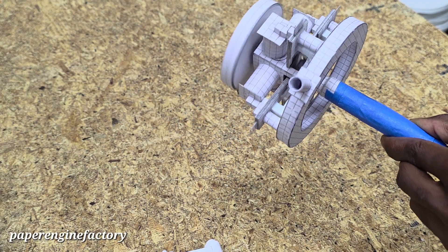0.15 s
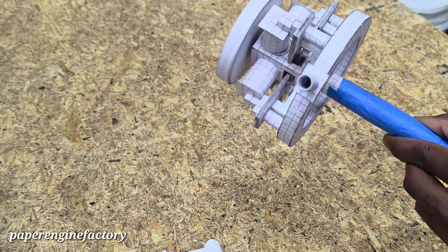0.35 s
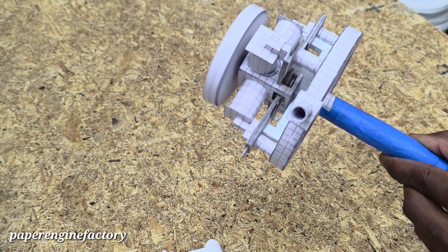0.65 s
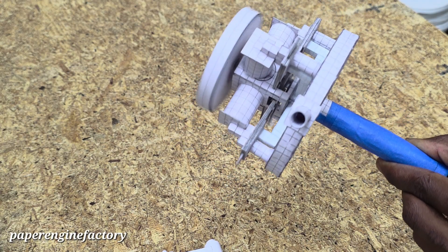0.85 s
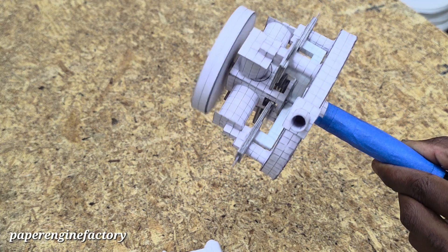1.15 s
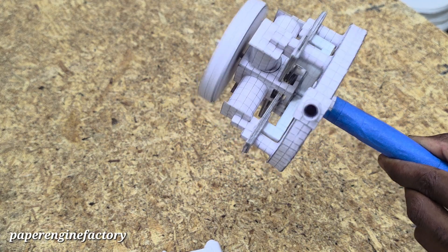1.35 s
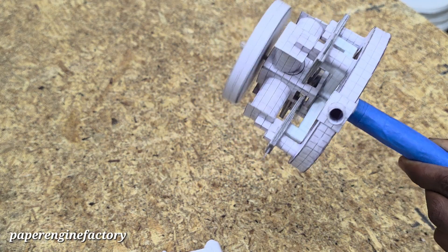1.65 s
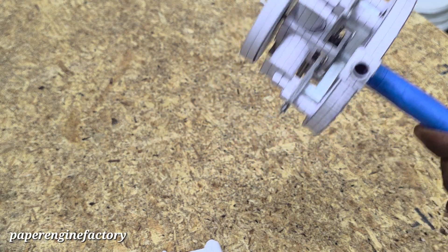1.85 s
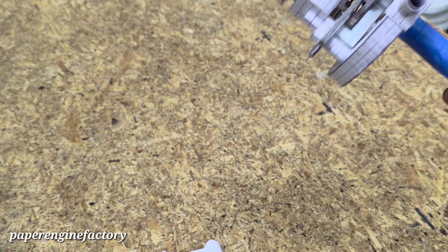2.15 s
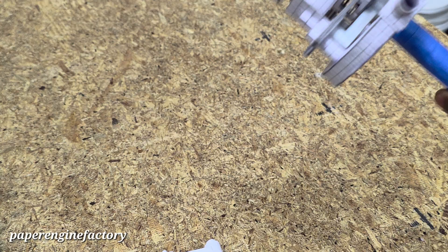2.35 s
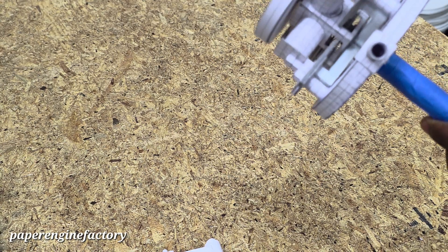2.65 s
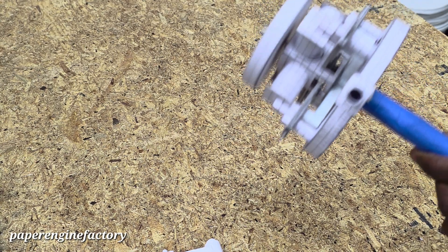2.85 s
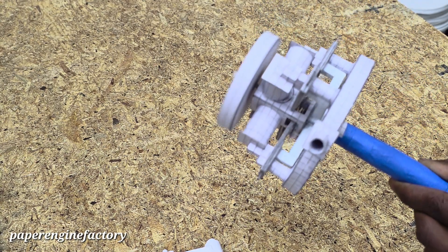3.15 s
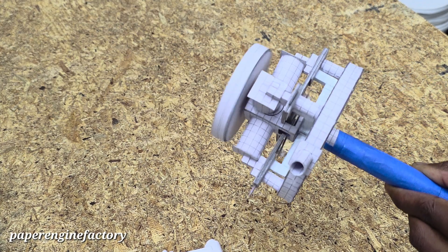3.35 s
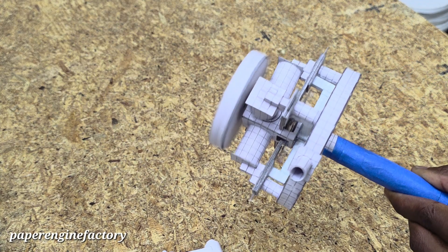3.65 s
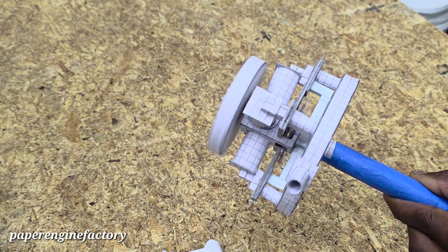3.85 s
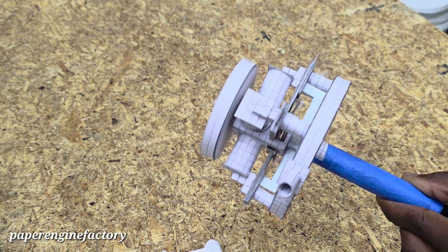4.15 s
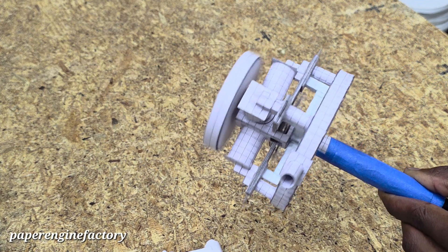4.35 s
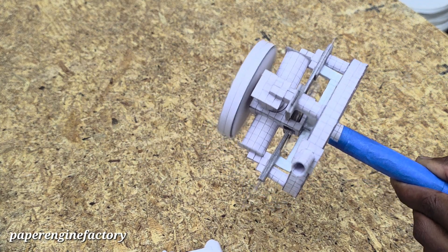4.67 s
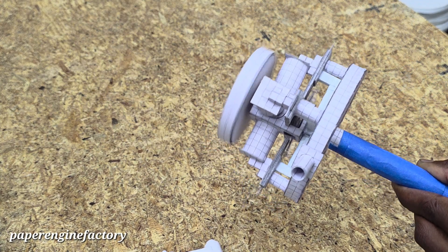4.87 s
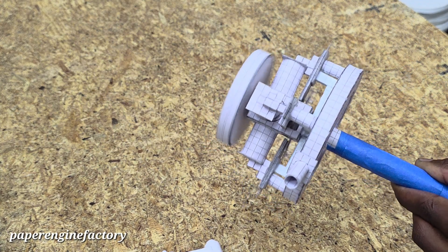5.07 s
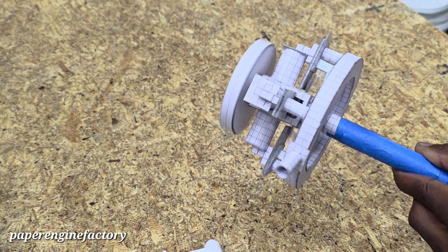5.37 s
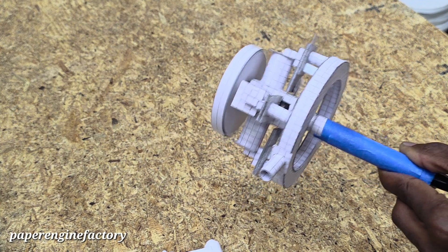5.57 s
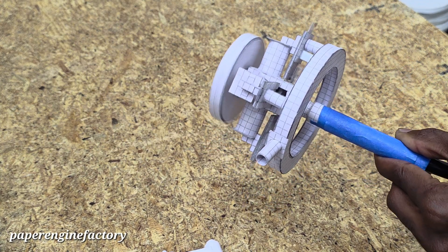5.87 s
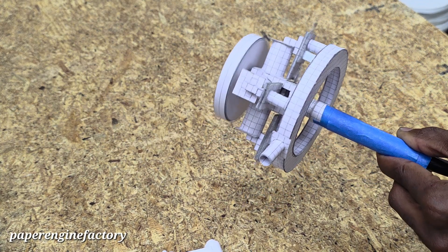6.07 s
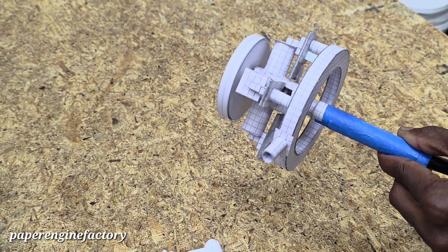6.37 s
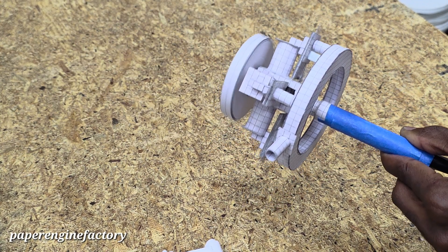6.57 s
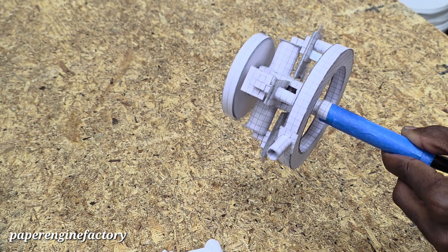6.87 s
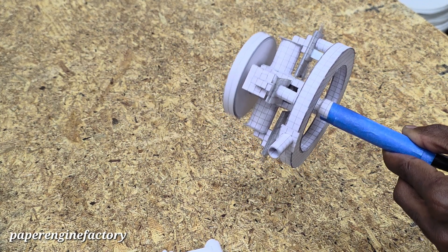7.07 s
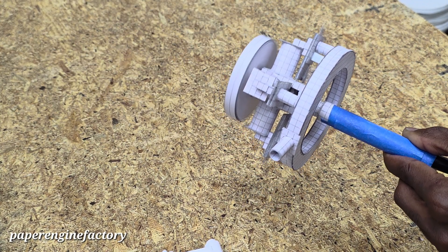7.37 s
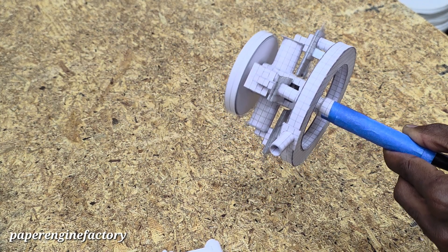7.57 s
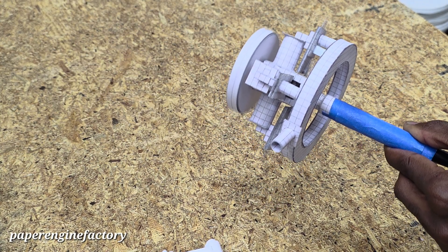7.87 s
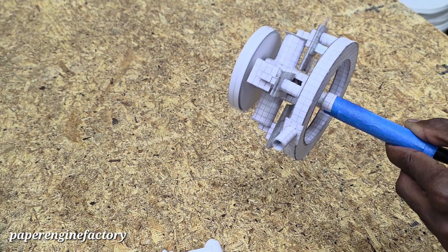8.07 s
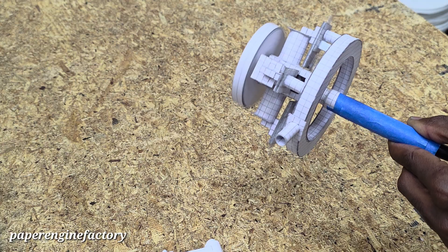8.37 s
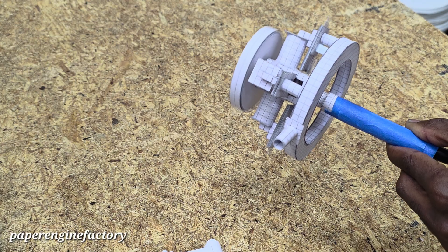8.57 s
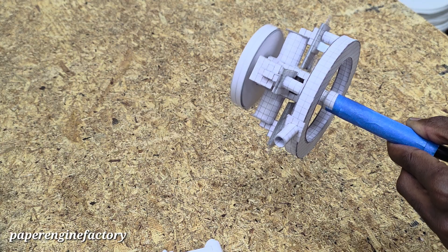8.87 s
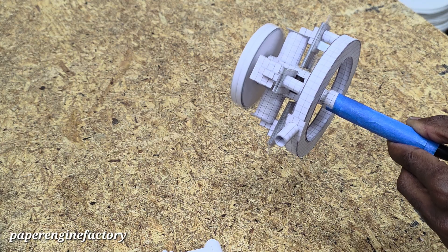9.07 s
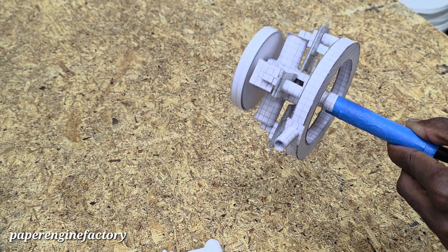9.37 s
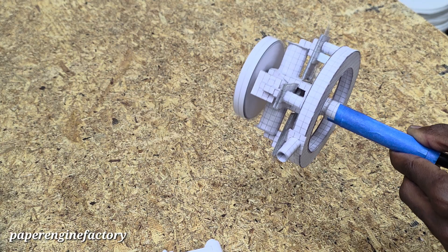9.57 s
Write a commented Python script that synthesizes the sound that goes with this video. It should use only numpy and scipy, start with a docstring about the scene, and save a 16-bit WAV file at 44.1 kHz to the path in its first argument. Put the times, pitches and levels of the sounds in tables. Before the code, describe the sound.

A small air-driven model engine idles faintly, then buzzes in rising and falling bursts over breathy hiss, finally settling into a fast, steady, rattling whirr.

```python
"""A faint hiss, chopped by exhaust puffs, idles first; bursts then lift pitch and level, and a steady run ends it.
A small paper engine, held over a chipboard bench, runs on compressed air; four uneven puffs a turn gate its noise.
Harmonics of the shaft rate make the hum; impulses through damped modes make the crank knocks and loose ticks.
The flywheel lags behind the air in the bursts. Low noise buffets two microphone ports of different colour."""
import sys
import numpy as np
from scipy import signal
from scipy.fft import rfft, irfft
from scipy.io import wavfile

SR = 44100
rng = np.random.default_rng(int(sys.argv[2]) if len(sys.argv) > 2 else 0)


def wrap_up_sound(samples):
    """Save the sound to the file named by the first command line argument, as 16-bit audio."""
    columns = np.atleast_2d(samples).T
    # keep every value between -1 and 1, then stretch to whole-number steps
    tamed = np.clip(columns, -1, 1)
    steps = np.round(tamed * 32767).astype(np.int16)
    wavfile.write(sys.argv[1], SR, steps)


N = 428652
TIME = np.arange(N) / SR  # s
FREQ = np.maximum(np.arange(N // 2 + 1) * SR / N, 1)  # Hz

# Idling on a trickle of air. Each row: time in seconds, air in dB, shaft speed in Hz (turns per second).
IDLE = [(0, -34, 23.5), (.13, -32.5, 21.3), (.2, -32.5, 23.34), (.49, -32.5, 24.94), (.66, -34, 23.3),
        (.76, -39, 21)]
# Bursts of air. Each row: valve opens in seconds, valve shuts in seconds, air before in dB, air at the top
# in dB, shaft before in Hz, shaft at the top in Hz, softness of the opening 0-1 (skew exponent of the rise).
BURSTS = [(0.844, 0.987, -36.5, -24.4, 21, 28.8, 0.46), (1.152, 1.273, -35.5, -24, 25.6, 34.1, 0.34),
          (1.397, 1.49, -31.5, -22.5, 32, 37.1, 0.27), (1.632, 1.785, -31, -21.5, 32.2, 41.85, 0.3),
          (2.044, 2.163, -40, -21.5, 18, 34.77, 0.36), (2.33, 2.454, -32, -21, 29.9, 38.33, 0.43),
          (2.548, 2.66, -30, -21.5, 32.3, 40.06, 0.7), (2.903, 3.037, -27, -19.5, 37.7, 46, 0.59),
          (3.189, 3.327, -29, -18, 37.3, 47.55, 0.44), (3.63, 3.832, -40, -15, 16.5, 62.4, 0.38),
          (4.014, 4.174, -32.5, -15.5, 22.9, 56.5, 0.39), (4.331, 4.467, -31, -15.5, 28.8, 54.9, 0.41),
          (4.648, 4.805, -25.2, -16, 44.8, 55.9, 0.51), (4.922, 5.059, -27.4, -17.5, 39.9, 52.15, 0.39),
          (5.188, 5.3, -27, -18.5, 39, 45.9, 0.57), (5.461, 5.535, -23.5, -19.0, 44, 45.57, 0.33),
          (5.687, 5.819, -26, -18.5, 41.6, 49.63, 0.32), (5.967, 6.148, -30.5, -17, 31.4, 49.1, 0.34)]
# The valve stays open. Each row: time in seconds, air in dB, shaft speed in Hz.
STEADY = [(6.28, -25, 38.9), (6.44, -22, 41.38), (6.67, -21.5, 42.62), (6.98, -18, 52.62),
          (7.11, -17, 56.15), (7.24, -16.5, 61.04), (7.29, -17.5, 60.03), (7.42, -18, 54.62),
          (7.57, -18.5, 55.45), (7.9, -15.5, 59.8), (8.02, -15.5, 64.4), (8.22, -16.5, 72.0),
          (8.4, -16, 64.7), (9.07, -15.5, 71.95), (9.33, -16, 73.04), (9.72, -16.5, 68.2)]
# The engine turns in the hand. Each row: time in seconds, top treble in dB, jet whistle in dB, low chuff
# in dB, band near 10 kHz in dB, all against the hiss; the air feed also shifts the two treble columns.
AIM = [(0, 4.5, -18, -24, -1), (.8, 3.5, -23, -13, 2), (1.5, 1, -19, -13, 1.5), (2.3, 3, -11, -11.5, 3.5),
       (2.9, 0, -10, -12.5, 1.5), (3.4, -.5, -20, -16, 2), (4.8, 0.5, -22, -20, 2),
       (5.8, 0.2, -21, -23, 1.5), (7.5, -0.3, -25, -33, 2), (9.7, 0.5, -21, -48, 2.5)]
# How far the flywheel faces the microphones. Each row: time in seconds, share 0-1.
FACING = [(0, 0.4), (.8, 0.3), (5, 0.4), (5.6, 0.3), (6.5, 0.99)]
# The exhaust puffs of one turn. Each entry: size in dB before random scatter.
PUFF_DB = [-2, -2.2, 2.5, -1]
# Colour of the rushing air. Each row: frequency in Hz, level in dB per Hz.
HISS = [(100, -19), (300, -3), (420, -12), (580, -9), (800, -14.5), (1100, -5), (1600, -3.5), (2100, -2),
        (3500, 0), (5100, -1.5), (8000, 0), (9200, -3), (14500, -2.5), (16000, -12.5)]
# Paper cavities rung by the air. Each row: frequency in Hz, width in Hz, level in dB seen from the side,
# level in dB seen from the flywheel, before slow drift.
CAVITIES = [(1174, 130, 4.5, 4), (2105, 156, -1.5, -4), (2925, 370, 0.5, -11.5), (3680, 190, -11, -4),
            (4360, 170, -9.5, -1.5), (6010, 470, -5.5, -8)]
# Colour of the chuff of slow, heavy puffs. Each row: frequency in Hz, level in dB per Hz.
CHUFF = [(120, -7.5), (260, 3), (330, -0.5), (450, -1), (750, -4.5), (1000, -5.5), (2000, -29), (5000, -50)]
# Exhaust hum. Each row: multiple of the shaft rate, relative dB at low speed, relative dB at high speed.
ORDERS = [(2, -28, -19), (3, -15, -8.5), (4, 3.5, 2), (5, -7.5, -7.5), (6, -4.5, -14), (7, -16.5, -22.5),
          (8, -7.5, -22), (9, -27, -21), (10, -9, -18.5), (12, -22, -31), (14, -16.5, -31), (18, -25, -22),
          (19, -35, -24)]
# Shell modes that lift the orders crossing them. Each row: frequency in Hz, width in Hz, added gain in dB.
SHELL = [(331.5, 76, -3.5), (1323, 250, 14.5)]
# The hum swells as the hand brings the exhaust nearer. Each row: time in seconds, gain in dB.
NEARNESS = [(0, 0.5), (1, 0.5), (1.8, 1), (3, 2.3), (3.7, 0.4), (5.5, 0.5), (6.2, -1.5), (7.3, 1.3),
            (8.3, -0.8), (9.7, -0.5)]
# How hard the crank knocks. Each row: time in seconds, dB against the air at the reference feed.
KNOCKING = [(0, -8), (.9, -20), (2.9, -21), (3.75, -11), (4.7, -10), (5.3, -15), (6.1, -10), (6.5, -14),
            (7.9, -14.5), (9.5, -22)]
# Modes of the frame under a knock. Each row: frequency in Hz, width in Hz, relative level in dB.
FRAME = [(330, 180, -16), (580, 180, -26), (1118, 63, 9), (1164, 58, 6.5), (1360, 80, -26.5),
         (2110, 130, -26), (3650, 400, -22)]
# Hard knocks of the crank. Each row: time in seconds, peak in dB before the room.
HARD_KNOCKS = [(3.705, -18), (3.742, -5), (4.072, -3), (4.102, -5), (4.439, -10), (4.457, -10),
               (6.055, -17), (6.124, -13), (6.898, -11)]
# Sharper clicks, some as the valve opens. Each row: time in seconds, impulse in dB before the body response.
CLICKS = [(.137, -24), (.287, -25), (.333, -22), (0.641, -23), (2.052, -25), (3.2, -19), (3.645, -24),
          (7.952, -8), (7.967, -17)]
# Colour of the buffeting. Each row: frequency in Hz, relative level in dB per Hz.
RUMBLE = [(15, -32), (45, -3), (85, -3.5), (130, -5), (220, -13), (500, -22), (2000, -70)]
# Stray air striking the ports. Each row: peak time in seconds, level in dB before flutter, length in
# seconds (centre to 1/e), left against right in dB.
GUSTS = [(1.066, -42, .09, 9), (1.6, -47, 0.28, 18), (2.2, -46, 0.089, 2), (3.1, -43, .12, 13),
         (3.8, -46, .12, 2), (4.16, -42, 0.081, 2), (5.25, -48, .1, 0), (6.85, -48, .2, -13),
         (7.37, -41.5, 0.099, -18), (8.67, -37, 0.084, -15), (9.5, -34.5, 0.089, -14)]
# Right port against the left. Each row: frequency in Hz, gain in dB.
RIGHT_PORT = [(120, 0), (370, -3), (550, -4.5), (930, -10.5), (1500, -8), (2200, -4), (4100, -0.5),
              (5200, -3.5), (8200, -3), (9200, -14), (10500, -9.5), (11800, 4.5), (13000, 6), (15500, 6)]

FLYWHEEL_LAG_S = .029  # in the bursts the speed follows the air this much later
REFERENCE_DB, REFERENCE_HZ = -20, 45  # air feed and shaft speed
HUM_DB = -25  # at the reference feed and speed, before nearness
HUM_PER_AIR, HUM_DB_PER_OCTAVE = 0.86, 3  # dB per dB of air, dB per octave of speed
STALL_HZ, STALL_DB_PER_OCTAVE = 28.4, 18  # below this speed the hum collapses
BRIGHT_PER_AIR = 0.21  # dB of extra top treble for each dB of air
DRAUGHT_DB = -50.5  # between the gusts, before flutter
TOP_HZ = 15800  # edge of the final low-pass


def undb(db):
    """Decibel definition: amplitude gain is ten to the power of dB over twenty."""
    return 10 ** (np.asarray(db) / 20)


def unit(x):
    """Normalisation: scale to rms 1."""
    return x / np.sqrt(np.mean(x ** 2))


def curves(table):
    """Linear interpolation: the columns of a timed table, sample by sample."""
    s, *columns = np.transpose(table)
    return [np.interp(TIME, s, c) for c in columns]


def colour(points):
    """Spectral envelope: gain over frequency from (Hz, dB) points, straight in log frequency."""
    hz, db = np.transpose(points)
    return undb(np.interp(np.log(FREQ), np.log(hz), db))


def resonances(modes):
    """Modal superposition: summed responses of damped oscillators."""
    return sum(undb(db) / (1 + 1j * (FREQ ** 2 - hz ** 2) / (FREQ * width)) for hz, width, db in modes)


def through(x, response):
    """Linear filtering: multiply the spectrum by a frequency response."""
    return irfft(rfft(x) * response, N)


def walk(rate):
    """Low-rate noise: random drift through `rate` knots per second, with a spread near 1."""
    knots = rng.standard_normal(8192)
    return 1.19 * np.interp(TIME * rate, np.arange(len(knots)), knots)


def pair(likeness):
    """Mid-side mixing: left and right noise with a given correlation."""
    mid, side = rng.standard_normal((2, N))
    c = np.clip(likeness, 0, 1)
    return np.sqrt((1 + c) / 2) * mid + np.sqrt((1 - c) / 2) * np.array([side, -side])


def scatter(cycle, spread_db):
    """Cycle-to-cycle variation: one random size for each cycle."""
    sizes = undb(spread_db * rng.standard_normal(8192))
    return sizes[cycle.astype(int) % 8192]


def ease(start, end, skew=1):
    """Raised-cosine step from 0 to 1; a skew under 1 makes it move early."""
    share = np.clip((TIME - start) / (end - start), 0, 1)
    return (1 - np.cos(np.pi * share ** skew)) / 2


def surges(idle, lows, tops, steady, rise_skews, fall_skew, lag_s=0):
    """Superposed steps from idle to steady: climb while the valve is open, sink until it opens again."""
    opens, shuts = np.transpose(BURSTS)[:2] + lag_s
    ends = np.append(opens[1:], STEADY[0][0])
    next_lows = np.append(lows[1:], steady[0])
    out = idle + (lows[0] - idle[-1]) * ease(IDLE[-1][0], opens[0])
    out = out + steady - steady[0]
    bursts = np.broadcast(opens, shuts, ends, lows, tops, next_lows, rise_skews)
    for start, shut, end, low, top, next_low, rise_skew in bursts:
        out = out + (top - low) * ease(start, shut, rise_skew)
        out = out + (next_low - top) * ease(shut, end, fall_skew)
    return out


def drive():
    """Inertia: the air level (dB) jumps at each burst; the flywheel's speed (Hz) follows late and more evenly."""
    (idle_db, idle_hz), (steady_db, steady_hz) = curves(IDLE), curves(STEADY)
    low_db, top_db, low_hz, top_hz, softness = np.transpose(BURSTS)[2:]
    air_db = surges(idle_db, low_db, top_db, steady_db, softness, fall_skew=0.58)
    shaft_hz = surges(idle_hz, low_hz, top_hz, steady_hz, rise_skews=.78, fall_skew=.654, lag_s=FLYWHEEL_LAG_S)
    return air_db, shaft_hz


def bench(x, lag_s=.0021, sway=0.0728, echo=0.25):
    """Comb interference: the bench returns the hiss a moment later; the swaying hand shifts the comb."""
    lag = lag_s * (1 + sway * walk(1.0))
    reflection = np.array([np.interp(TIME - lag, TIME, side) for side in x])
    return unit(x + echo * reflection)


def air(turns, air_db, puff_width=0.47, leak=1.0, puff_scatter_db=2.5, flutter_db=0.63, top_flutter_db=1.0,
        drift_db=2.0, whistle_hz=7900, whistle_width=900):
    """Flow-modulated turbulence: a steady leak plus a puff from each port in turn rings the paper cavities."""
    top_db, whistle_db, chuff_db, hollow_db = curves(AIM)
    facing = curves(FACING)[0]
    stroke = len(PUFF_DB) * turns
    size = undb(PUFF_DB)[stroke.astype(int) % len(PUFF_DB)] * scatter(stroke, puff_scatter_db)
    puffs = size * np.exp(-((stroke % 1 - .5) / puff_width) ** 2)  # each port slides open and shut
    flow = (leak + puffs) * undb(flutter_db * walk(35))
    # long waves reach both microphones alike, short ones do not
    shared = 1 / (1 + (FREQ / 3100) ** 2)
    rush = rfft(pair(0.68) * flow) * np.sqrt(shared)
    rush = rush + rfft(pair(0.034) * flow) * np.sqrt(1 - shared)
    spectrum = (rush * colour(HISS)).astype(np.complex64)

    def part(response):
        """Linear filtering: the share of the hiss that passes a response."""
        return irfft(spectrum * np.complex64(response), N)

    # the top treble leaves in a narrow, unsteady beam; the band just below it has its own level
    bright_db = BRIGHT_PER_AIR * (air_db - REFERENCE_DB)
    beam = undb(top_db + bright_db + top_flutter_db * walk(25))
    jet = part(0.91) + (beam - 1) * part(1 / (1 + (11000 / FREQ) ** 8))
    hollow = part(np.exp(-((FREQ - 10200) / 1500) ** 2))
    jet = jet + (undb(hollow_db + bright_db) - 1) * hollow
    for hz, width, side_db, front_db in CAVITIES:
        db = side_db + facing * (front_db - side_db) + drift_db * walk(2.53)
        jet = jet + part(resonances([(hz, width, 0)])) * undb(db)
    whistle = unit(part(resonances([(whistle_hz, whistle_width, 0)])))
    chuff = unit(through(rng.standard_normal(N) * puffs, colour(CHUFF)))
    return bench(jet) + undb(whistle_db) * whistle + undb(chuff_db) * chuff


def judder(turns, shaft_hz, shell_hz=318, shell_width=130, judder_db=-11, smooth_hz=31, fade_hz=8):
    """Friction excitation: at low speed the pistons drag twice a turn and shake the shell; speed smooths it."""
    drag = rng.standard_normal(N) * np.exp(-(2 * turns % 1) / 0.56)
    slow = np.clip((smooth_hz - shaft_hz) / fade_hz, 0, 1)
    shell = resonances([(shell_hz, shell_width, 0)]) ** 2
    return unit(through(drag, shell)) * slow * undb(judder_db)


def hum(turns, shaft_hz, slow_hz=38, fast_hz=66, rough=0.1, wobble_rad=.025, bass_hz=112):
    """Fourier synthesis of exhaust pressure: the fourth order leads; slow, distinct puffs are richer."""
    fast = np.clip((shaft_hz - slow_hz) / (fast_hz - slow_hz), 0, 1)
    angle = 2 * np.pi * turns + wobble_rad * (1 - fast / 2) * walk(40)
    out, power = 0, 0
    for order, slow_db, fast_db in ORDERS:
        hz = order * shaft_hz
        lift = 1 + sum(undb(db) / (1 + (2 * (hz - centre) / width) ** 2) for centre, width, db in SHELL)
        radiation = 1 / np.sqrt(1 + (bass_hz / hz) ** 6)  # so small a body gives off little bass
        size = undb(slow_db + fast * (fast_db - slow_db)) * lift * radiation
        tone = np.sin(order * angle + rng.uniform(0, 2 * np.pi))
        out = out + size * tone * (1 + rough * walk(45))
        power = power + size ** 2 / 2
    return out / np.sqrt(power)


def hum_level(air_db, shaft_hz):
    """Source strength in dB: more air, more speed and a nearer exhaust make a louder note."""
    stall = np.minimum(np.log2(shaft_hz / STALL_HZ), 0)
    speed_db = HUM_DB_PER_OCTAVE * np.log2(shaft_hz / REFERENCE_HZ) + STALL_DB_PER_OCTAVE * stall
    return HUM_DB + HUM_PER_AIR * (air_db - REFERENCE_DB) + speed_db + curves(NEARNESS)[0]


def knocks(turns, shaft_hz, knock_db, knock_scatter_db=3, minor_db=-12, scrape=0.89, steady_hz=85):
    """Impact excitation: the crank takes up its play hard once a turn, lightly at other strokes; speed evens it."""
    stroke = len(PUFF_DB) * turns
    starts = np.diff(np.floor(stroke), prepend=0)
    uneven = scatter(stroke, knock_scatter_db) ** np.clip(2 * (1 - shaft_hz / steady_hz), 0, 1)
    size = np.where(stroke.astype(int) % len(PUFF_DB) == 0, 1, undb(minor_db)) * uneven
    blows = unit(starts * size / np.sqrt(shaft_hz))
    rub = unit(rng.standard_normal(N) * np.exp(-(turns % 1) / 0.32))
    rub = rub * np.clip(1.9 - shaft_hz / 52, .3, 1)  # a fast crank floats and scrapes less
    frame = resonances(FRAME)
    hard = np.zeros(N)
    for s, db in HARD_KNOCKS:
        hard[int(s * SR)] = undb(db)
    hard = through(hard, frame) / np.max(abs(irfft(frame, N)))
    return unit(through(blows + scrape * rub, frame)) * undb(knock_db) + hard


def knock_level(air_db, per_air=1.45, wander_db=2.3):
    """Impact strength in dB: the crank knocks harder under more air, and never quite evenly."""
    feed_db = REFERENCE_DB + per_air * (air_db - REFERENCE_DB)
    return feed_db + curves(KNOCKING)[0] + wander_db * walk(12)


def ticks(air_db, per_second=60, tick_db=-15, size_db=4.5, decay_s=0.0028):
    """Random impulses: loose parts tick, harder under more air; now and then a sharper click, some from the
    opening valve."""
    sizes = undb(size_db * np.minimum(rng.exponential(size=N), 4))
    hits = (rng.random(N) < per_second / SR) * sizes * undb(air_db + tick_db)
    for s, db in CLICKS:
        hits[int(s * SR)] += undb(db)
    fade = signal.lfilter([1], [1, -np.exp(-1 / (decay_s * SR))], hits)
    body = resonances([mode[:3] for mode in CAVITIES]) + 0.27
    return through(pair(0.45) * fade, body / np.sqrt(np.mean(abs(body) ** 2)))


def room(x, t60_s=0.18, wet_db=-17):
    """Reverberation: exponentially decaying noise gives short, dull reflections from bench and workshop."""
    tail = rng.standard_normal((2, N)) * undb(-60 * TIME / t60_s) * (TIME > .003)
    response = rfft(tail) / np.sqrt(np.sum(tail ** 2) / 2)
    response = response / np.sqrt(1 + (FREQ / 6000) ** 2)
    return x + undb(wet_db) * through(x, response)


def buffeting(flutter_db=2):
    """Wind noise: a low draught round both ports; gusts swell and die away, the strongest on the right."""
    size = undb(DRAUGHT_DB)
    for s, db, length_s, left_db in GUSTS:
        sides = undb([[db + left_db / 2], [db - left_db / 2]])
        size = size + sides * np.exp(-((TIME - s) / length_s) ** 2)
    return unit(through(pair(0.81), colour(RUMBLE))) * size * undb(flutter_db * walk(11))


def scene(rush_db=3.0):
    """Common drive: shaft speed times the puffs, hum and knocks; the air feed sets the engine's strength."""
    air_db, shaft_hz = drive()
    turns = np.cumsum(shaft_hz) / SR
    engine = (air(turns, air_db) + judder(turns, shaft_hz)) * undb(air_db + rush_db)
    engine = engine + ticks(air_db)
    engine = engine + hum(turns, shaft_hz) * undb(hum_level(air_db, shaft_hz))
    engine = engine + knocks(turns, shaft_hz, knock_level(air_db))
    return room(engine) + buffeting()


def record(dry, ceiling=0.58):
    """Port response and saturation: a notch and treble peak on the right; peaks are rounded, the top is cut."""
    ports = np.array([dry[0], through(dry[1], colour(RIGHT_PORT))])
    rounded = ports / (1 + (ports / ceiling) ** 4) ** (1 / 4)
    low_pass = signal.ellip(10, .2, 80, TOP_HZ, fs=SR, output="sos")
    return signal.sosfilt(low_pass, rounded)


dry = scene()
out = record(dry)
wrap_up_sound(out)
```